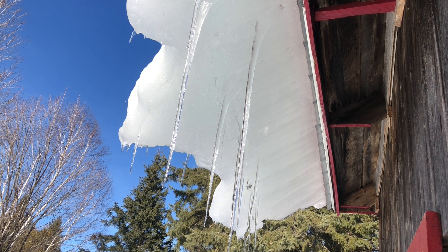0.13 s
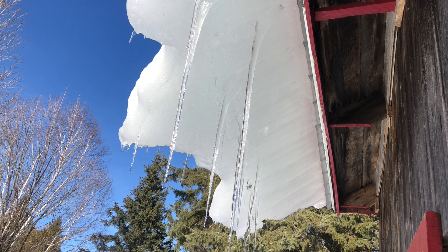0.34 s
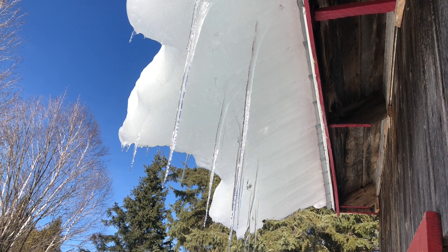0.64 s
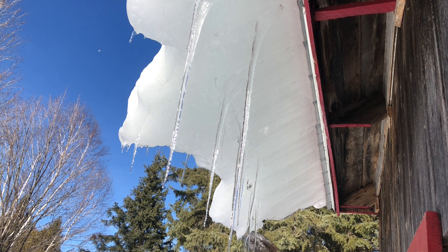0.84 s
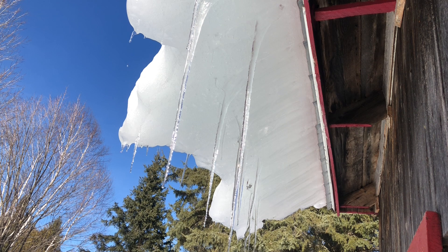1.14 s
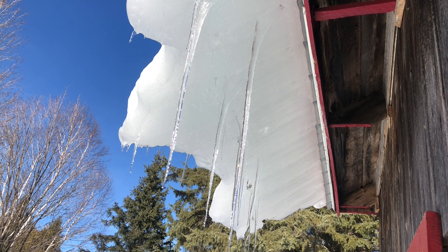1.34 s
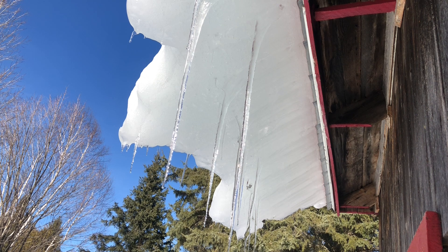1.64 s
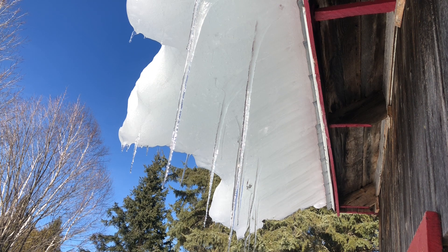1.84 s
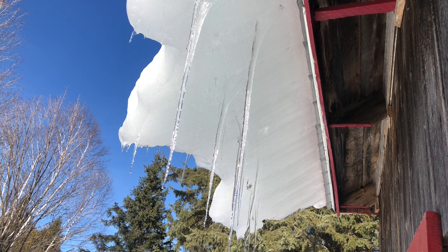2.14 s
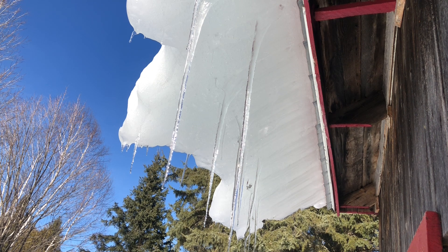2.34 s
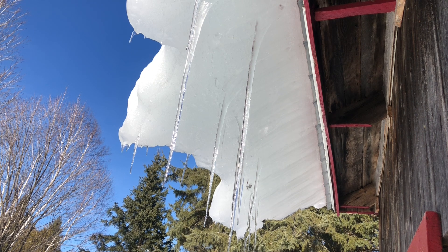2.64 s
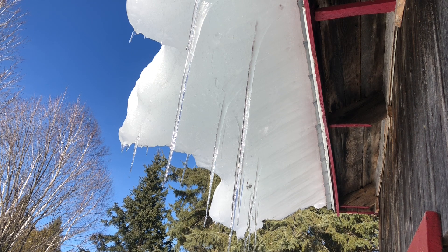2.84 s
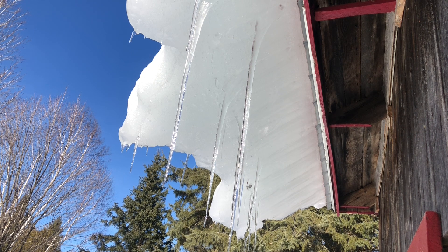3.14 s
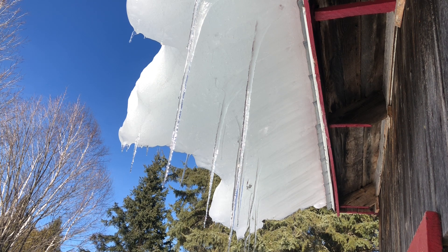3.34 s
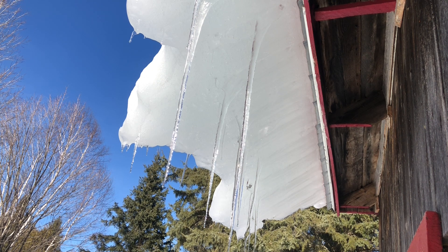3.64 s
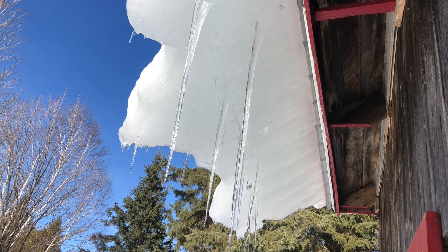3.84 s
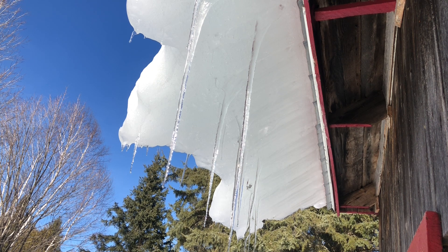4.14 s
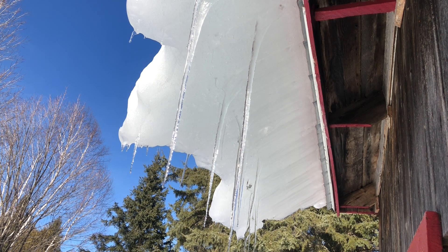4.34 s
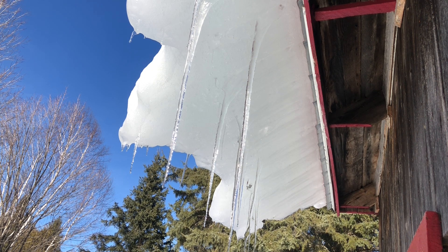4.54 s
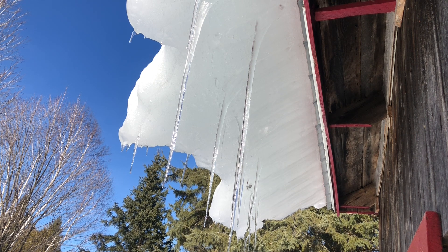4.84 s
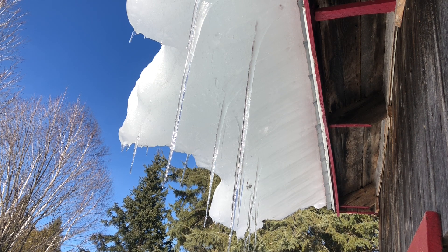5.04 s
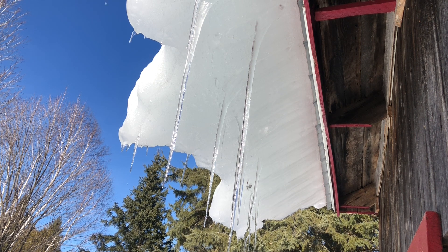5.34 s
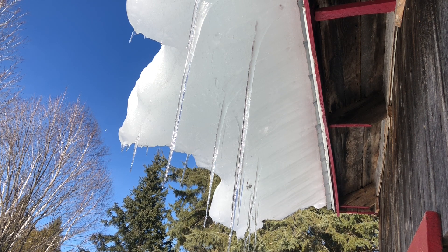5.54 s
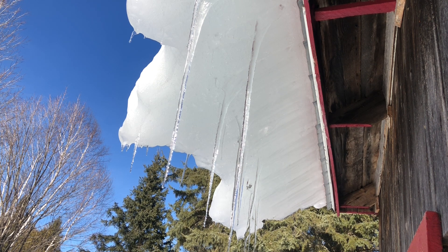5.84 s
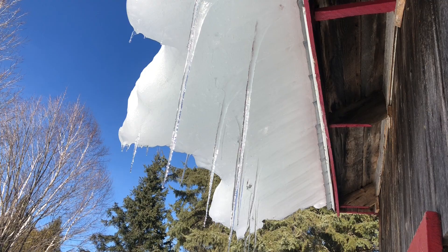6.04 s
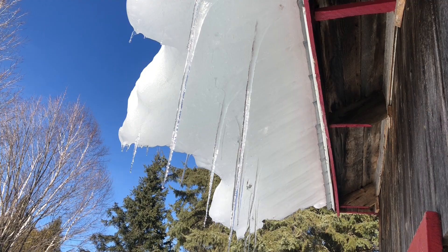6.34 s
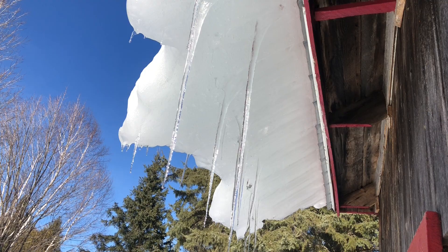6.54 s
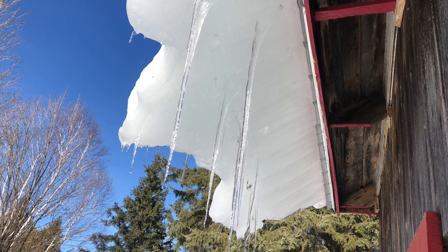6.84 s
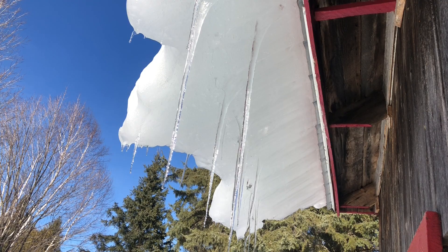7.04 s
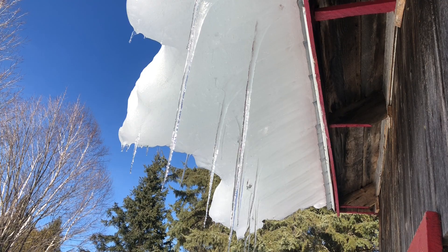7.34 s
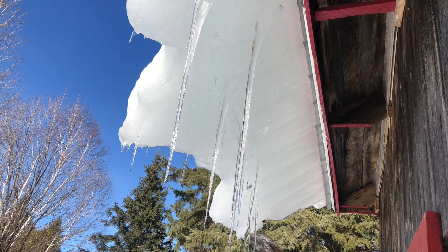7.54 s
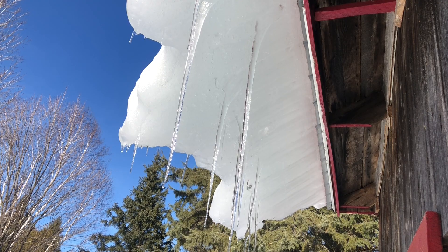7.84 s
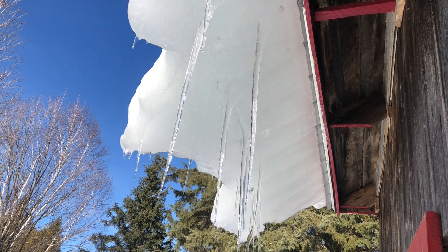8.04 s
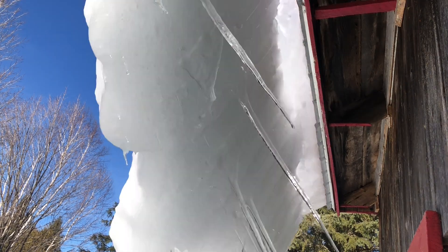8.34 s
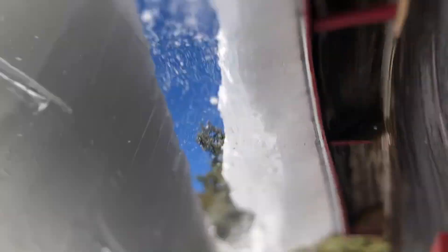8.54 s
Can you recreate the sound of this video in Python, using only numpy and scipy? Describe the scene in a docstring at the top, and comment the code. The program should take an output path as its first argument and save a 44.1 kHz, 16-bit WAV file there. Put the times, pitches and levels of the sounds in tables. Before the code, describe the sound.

Outdoors beside a shed, a faint hiss and low hum of distant traffic runs throughout. From the start until about 7.5 seconds, meltwater drips from icicles close by: quiet, sharp, irregular ticks, several a second, each with a tiny high ring and a fine splash. At about 0.8 seconds the snow slab on the roof gives a short crack, knocking through the boards and metal sheet. Another crack comes at about 7.5 seconds, followed by a quick run of smaller ones. Around 8 seconds the slab tears loose and slides, swelling into a loud, rough, grinding crunch with rumble and dull thuds. It is loudest from about 8.2 seconds to the end near 8.7, with bright clinks of snapping icicles around 8.6 and the peaks slightly overloading the microphone.

```python
"""Over the hiss of a distant road, meltwater drips from icicles under the eave of a shed:
each drop a tick, a short ring and a spray of droplets. The snow slab on the roof cracks a few
times, shaking the boards and the metal sheet, then tears loose and slides off with a grinding
crunch, rumble, snapping icicles and thuds, loud enough to round off in the phone."""
import sys
import numpy as np
from scipy import signal
from scipy.fft import rfft, irfft, next_fast_len
from scipy.io import wavfile
from scipy.ndimage import uniform_filter1d

SR = 44100
rng = np.random.default_rng(int(sys.argv[2]) if len(sys.argv) > 2 else 0)


def output_pcm(signal):
    """Save a mono or channel-first signal as 16-bit PCM at the path in sys.argv[1].

    Samples are clipped to [-1, 1] before scaling.
    """
    pcm = np.clip(np.atleast_2d(signal).T, -1, 1) * 32767
    wavfile.write(sys.argv[1], SR, np.round(pcm).astype(np.int16))


N = 382781
T = np.arange(N) / SR


def undb(db):
    return 10 ** (np.asarray(db) / 20)


def unit(x):
    return x / np.sqrt(np.mean(x ** 2))


def band(x, lo_hz, hi_hz):
    sos = signal.butter(2, [lo_hz, min(hi_hz, SR / 2.1)], "band", fs=SR, output="sos")
    return signal.sosfilt(sos, x)


def colour(x, points):
    """EQ through (f/Hz, level/dB) points."""
    hz, db = np.transpose(points)
    size = next_fast_len(len(x))
    log_f = np.log(np.maximum(np.fft.rfftfreq(size, 1 / SR), 1))
    return irfft(rfft(x, size) * undb(np.interp(log_f, np.log(hz), db)), size)[:len(x)]


def modes(x, table):
    """A bank of resonators in alternating polarity."""
    return sum((-1) ** k * undb(db) * signal.lfilter(*signal.iirpeak(hz, hz / width, fs=SR), x)
               for k, (hz, width, db) in enumerate(table))


def fade(t, t60):
    return np.exp(-np.log(1000) * np.maximum(t, 0) / t60)


def add(out, when, x):
    i = int(when * SR)
    out[i:i + len(x)] += x[:len(out) - i]


def walk(rate_hz):
    """Random sample-and-hold modulation, smoothed twice."""
    hold = int(SR / rate_hz)
    steps = np.repeat(rng.standard_normal(N // hold + 1), hold)
    return uniform_filter1d(uniform_filter1d(steps, hold), hold)[:N]


def grit(size, spread_db):
    """Dense breaking grains, a few of them much larger than the rest."""
    return unit(rng.standard_normal(size) * undb(spread_db * rng.exponential(size=size)))


# EQ curve of the road bed: f/Hz, relative level/dB
ROAD_EQ = [(18, -51), (30, -12.5), (86, -4.5), (170, -10.5), (280, -5), (426, -10), (540, -4), (632, -4.5),
           (1010, 1), (1630, -16.5), (2170, -21), (2540, -30), (5310, -42.5), (14400, -47.5), (16000, -55)]
# Passing traffic rides the bed: t/s, tyre level/dB, tyre tilt/(dB per octave), 250 Hz drone level/dB
TRAFFIC = [(0, 0, 7, 7), (.7, 1, 2.5, 5), (1.6, -1.5, 5.5, 3), (2.7, 0, 2.5, 0), (3.5, 1, 5, 1.5),
           (4.5, -1, 2.5, -0.5), (5.1, 1.5, 6.5, -1), (5.8, -1.5, 3.5, -2.5), (7.2, 0.5, 5.5, 2),
           (8.68, 1.5, 4, 13)]


def road():
    """Distant traffic in half-octave bands that swell and flicker a little; the rumble grows."""
    times, *columns = np.transpose(TRAFFIC)
    tyre_db, tilt_db, drone_db = (np.interp(T, times, column) for column in columns)
    rumble_db = -6.5 + 1.14 * T
    tyres_db = [tyre_db + tilt_db * octaves for octaves in (-.5, 0, .5)]
    faders_db = [rumble_db, rumble_db / 2, 0, drone_db, drone_db / 2, tyre_db, *tyres_db, tyre_db, 0]
    size = next_fast_len(N)
    spectrum = rfft(undb(-54) * unit(colour(rng.standard_normal(N), ROAD_EQ)), size)
    hz = np.maximum(np.fft.rfftfreq(size, 1 / SR), 1)
    half_octaves = np.clip(2 * np.log2(hz / 1000), -7, 3)
    out = np.zeros(N)
    for centre, db in enumerate(faders_db, start=-7):
        share = np.clip(1 - np.abs(half_octaves - centre), 0, 1)
        out += irfft(spectrum * share, size)[:N] * undb(db + 0.79 * walk(4.9))
    return out


# Engine tones: start t/s, crest t/s, end t/s, start f/Hz, end f/Hz, level/dB, waver rate/Hz
ENGINE_HUMS = [(5.5, 6.1, 7.9, 303, 294, -64.5, 9), (3, 6.0, 7.9, 97, 98, -71.5, 12),
               (0.0, 2.9, 4, 254, 204, -68, 26.3), (3, 3.1, 3.6, 673, 770, -64.5, 7),
               (3.5, 4.7, 4.5, 540, 560, -69, 12), (6, 8.5, 8.0, 202, 200, -68, 9)]


def engines():
    """Far engines hum, glide and waver; each swells toward its crest and drops out at its end."""
    out = np.zeros(N)
    steady, swell_db = 0.83, 6
    for start, crest, end, start_hz, end_hz, db, waver_hz in ENGINE_HUMS:
        hz = np.interp(T, [start, end], [start_hz, end_hz])
        tone = np.exp(2j * np.pi * np.cumsum(hz) / SR)
        waver = steady + unit(walk(waver_hz)) + 1j * unit(walk(waver_hz))
        swell = np.interp(T, [start, crest, end], [-1, 0, -1], left=-10, right=-10)
        out += undb(db + swell_db * swell) * np.real(tone * waver)
    return out


def drip(db, hz, treble_db):
    """A drop lands: a sharp tick, a short ring, and droplets that scatter after it."""
    t = T[:4000]
    tick = 3 * np.minimum(t / .0007, 1) ** 2 * fade(t - .0007, .004)
    envelope = tick + .5 * fade(t, 0.039) + undb(-0.5) * fade(t, 0.079)
    droplets = grit((3, len(t)), spread_db=2.9) * envelope
    mid = 1.17 * undb(-treble_db / 2) * band(droplets[0], 2930, 6100)
    splash = mid + undb(treble_db / 2) * band(droplets[1], 6500, 14050)
    pitched_spray = band(droplets[2], hz / 1.2, hz * 1.37)
    # duller drops ring louder, lower drops ring longer
    ring = undb(-5.5 - 0.05 * treble_db) * np.sin(2 * np.pi * hz * t)
    ring *= np.minimum(t / 0.0011, 1) * fade(t, 0.0089 + 48 / hz)
    drop = splash / np.abs(splash).max() + 0.48 * pitched_spray / np.abs(pitched_spray).max() + ring
    return undb(db) * drop / np.abs(drop).max()


# Close drops landing: t/s, level/dB, ring f/Hz, treble over mid/dB
DRIPS = [(0.2825, -63, 13600, 2), (0.3258, -56, 11200, 3), (0.4052, -51, 5570, -7),
         (0.5186, -49.5, 7740, 12), (0.552, -45.5, 7440, 3), (0.5894, -63, 10300, 8),
         (0.673, -45.5, 14660, -3), (1.0229, -53, 7550, 6), (1.266, -54.5, 3000, -6),
         (1.2937, -42, 14600, 14), (1.3, -47, 5450, -1), (1.3799, -55, 9710, 2), (1.3962, -55, 4800, -7),
         (1.4113, -48.5, 4830, 0), (1.4628, -49, 6540, 8), (1.495, -50.5, 10660, 13),
         (1.497, -49.5, 10000, 12), (1.552, -57.5, 3260, -10), (1.7367, -49, 5050, 12),
         (1.7652, -60, 11200, 5), (1.856, -48, 14600, 7), (2.0982, -57, 15400, 10), (2.4207, -58, 4870, 9),
         (2.4427, -58, 10600, 7), (2.6013, -58.5, 9650, 11), (2.7129, -56, 14100, 0),
         (2.8033, -44, 3830, -5), (2.8651, -54, 4860, 5), (2.8944, -49, 15120, 14), (3.09, -51.5, 5280, -6),
         (3.1493, -59.5, 9240, -3), (3.2408, -51.5, 10900, 18), (3.491, -48.5, 7000, 4),
         (3.6923, -51.5, 5660, 13), (3.8352, -49.5, 8700, -1), (3.8724, -49, 13700, 14),
         (4.0478, -54, 4410, -4), (4.0577, -51, 10490, 13), (4.18, -54, 6350, 12),
         (4.3791, -48.5, 5820, -4), (4.5386, -62, 13310, 2), (4.643, -53, 4670, -13),
         (4.8293, -52.5, 5800, -2), (4.9783, -49.5, 5070, -4), (5.2636, -47, 13220, 9),
         (5.2775, -41, 9200, 14), (5.2905, -55, 10500, 7), (5.3885, -60, 11050, 11),
         (5.614, -60.5, 13800, 1), (5.8044, -60, 7850, 3), (5.8509, -54, 5040, 1), (5.9025, -58, 6160, -3),
         (5.9144, -40.5, 10300, 9), (5.9626, -58.5, 5020, -1), (6.0177, -60, 4280, 5),
         (6.413, -53, 7700, 12), (6.683, -57, 3900, -6), (6.925, -49.5, 7400, 9), (6.9464, -55, 4360, 2),
         (7.0271, -61, 11300, 6), (7.0934, -65, 10900, 8), (7.3823, -51.5, 9400, 4),
         (7.4031, -54.5, 6550, 4), (7.4406, -57, 7850, -1), (7.4559, -50, 6300, -3)]


def drips():
    """The close drops, many faint ones further along the eave, and slapback from the shed wall."""
    out = np.zeros(N)
    for when, db, hz, treble_db in DRIPS:
        add(out, when, drip(db, hz, treble_db))
    for when, size, pitch, tilt in rng.random((75, 4)):
        add(out, when * N / SR, drip(db=-74 + 9 * size, hz=3500 + 9000 * pitch, treble_db=14 * tilt - 5))
    slap_s, slap_db = .0054, -18
    return out + undb(slap_db) * np.roll(out, int(slap_s * SR))


# Woody body of the roof boards: f/Hz, width/Hz, level/dB
BOARD_MODES = [(55, 71, -9), (157, 38, 0), (232, 45, 1.5), (302, 24, 1.5), (380, 60, 0), (464, 67, -0.5),
               (577, 150, -8.5), (830, 60, -11.5), (1270, 130, -12)]
# Bright ring of the roof sheet: f/Hz, width/Hz, level/dB
SHEET_MODES = [(2080, 270, -7.5), (2440, 44, 6.5), (2960, 180, -1.5), (3295, 89, 6), (3300, 27, 10),
               (3930, 200, 4), (4530, 43, 0.5), (6400, 27, 1), (6990, 130, -1)]
# Dry knock that opens each crack: f/Hz, width/Hz, level/dB
KNOCK_MODES = [(680, 128, -2), (1070, 200, -11.5)]
# The slab slips: t/s, level/dB, slip length/s, knock send/dB, crunch send/dB, hiss send/dB
CRACKS = [(0.778, -41, .005, 12, -2.5, -20), (0.786, -34.5, .026, 19, -4, -16),
          (7.477, -29, 0.011, 15.5, -1, -13.5), (7.574, -48.5, 0.014, 19, -3, -32),
          (7.7532, -48, 0.0052, 28, -8.5, -25), (7.772, -43.5, 0.0095, 28, -8, -28),
          (7.795, -47.5, 0.04, 19, -12, -24.5), (7.943, -39.5, 0.0036, 26, -4.5, -33),
          (7.965, -39.5, 0.009, 22, -10, -23), (7.99, -41.5, 0.0034, 21, -22, -25),
          (8.026, -40.5, 0.01, 28, -22, -23), (8.067, -31.5, 0.0044, 18, -7, -41),
          (8.089, -39, 0.0059, 22, -6, -35), (8.287, -31.5, 0.002, 10, 10.5, -12),
          (8.46, -32, 0.0036, 11, -8, -25), (8.533, -26, 0.014, 10, 8, -13)]


def cracks():
    """Each slip knocks, then small fractures shake the boards and the sheet; crumbs trickle after."""
    fractures, crumbs = np.zeros((2, 3, N))  # three buses each: body, crunch, ice hiss
    knocks = np.zeros(N)
    t = T[:SR // 2]
    for when, db, slip_s, knock_db, crunch_db, hiss_db in CRACKS:
        knocks[int(when * SR)] = undb(db + knock_db)
        for bus, send_db in enumerate((0, crunch_db, hiss_db)):
            grains = undb(db + send_db) * np.minimum(t / 0.00064, 1) * grit(len(t), spread_db=1.86)
            # a longer slip dies away more slowly and leaves more crumbs
            add(fractures[bus], when, grains * fade(t - slip_s, 0.046 + 2.4 * slip_s))
            add(crumbs[bus], when, grains * undb(-18.5 + 250 * slip_s) * fade(t, 0.39))
    body = 7 * modes(fractures[0] + crumbs[0] + knocks, BOARD_MODES) + 9 * modes(knocks, KNOCK_MODES)
    sheet = 1.6 * modes(fractures[1], SHEET_MODES)
    crunch = 0.81 * band(fractures[1] + 2.46 * crumbs[1], 1710, 5300)
    ice = fractures[2] + crumbs[2]
    hiss = band(ice, 3600, 15600) + 1.4 * band(ice, 7800, 10740)
    return body + sheet + crunch + hiss


def blow(db, hz, t60):
    """One struck resonance: a sine that builds within a cycle and dies away."""
    t = T[:SR // 4]
    return undb(db) * np.sin(2 * np.pi * hz * t) * np.minimum(t * hz / 0.72, 1) * fade(t, t60)


# Dull hits of snow: t/s, level/dB, f/Hz
THUDS = [(0.779, -25, 400), (0.787, -26, 368), (7.479, -26, 330), (7.488, -27, 290), (7.791, -39, 71),
         (7.97, -35, 66), (8.051, -18.5, 239), (8.089, -21, 96), (8.17, -21, 80), (8.22, -18, 90),
         (8.236, -8, 490), (8.287, -16, 81), (8.476, -7, 616), (8.522, -7.5, 340), (8.55, -9.5, 342),
         (8.57, -10, 90), (8.611, -4, 73), (8.63, -19, 48), (8.655, -17, 85)]
# Bright pings of ice: t/s, level/dB, f/Hz
CLINKS = [(8.54, -26, 4540), (8.556, -17.5, 3740), (8.589, -20, 3790), (8.595, -21, 5130)]


def impacts():
    """The roof thuds as the slab breaks and its lumps land; snapped icicle pieces ring."""
    out = np.zeros(N)
    for when, db, hz in THUDS:
        add(out, when, blow(db, hz, t60=0.014 + 6.5 / hz))
    for when, db, hz in CLINKS:
        add(out, when, blow(db, hz, t60=.05))
    return out


def shards(start, end):
    """Small ice fragments knock about in the moving snow, each with a brief pitch of its own."""
    out, t = np.zeros(N), T[:2000]
    for when, pitch, size, ring in rng.random((90, 4)):
        hz = 1700 * 2 ** (1.6 * pitch)
        ping = np.sin(2 * np.pi * hz * t) * fade(t, 0.012 + 0.06 * ring)
        add(out, start + when * (end - start), undb(12.4 * size - 5.5) * ping)
    return out


# Resonances of the grinding slab: f/Hz, width/Hz, level/dB
SLAB_MODES = [(336, 100, -4), (423.5, 13, 7), (522, 34, -5), (556.6, 29, 8.5), (685, 73, -3.5),
              (770, 75, 8), (860, 53, -2), (1055, 53, 7.5), (1115, 110, -5), (1260, 52, 6.5),
              (1340, 90, -5), (1646, 500, -3)]
# Automation of the slide: t/s, level/dB, brightness/dB
SLIDE_CURVE = [(7.945, -43, -9), (8.02, -43, -11), (8.06, -36.5, -10.5), (8.13, -35, -11), (8.23, -20, -11),
               (8.28, -22, -7.5), (8.32, -26, -7.5), (8.4, -21, -6.5), (8.46, -18, -3.5), (8.52, -19.5, 3),
               (8.58, -23.5, 4.5), (8.64, -23.5, -4.5), (8.68, -30, -6)]


def slide():
    """Snow grinds over the roof in uneven lurches: scrape, rumble, icy crunch and hiss."""
    times, *columns = np.transpose(SLIDE_CURVE)
    level_db, bright_db = (np.interp(T, times, column) for column in columns)
    grind = grit(N, spread_db=3.24)
    grind = unit(modes(grind, SLAB_MODES)) + 1.4 * unit(band(grind, 238, 2840))
    low_scrape = unit(band(grind, 236, 902)) * undb(3 * walk(70))
    high_scrape = unit(band(grind, 724, 1710)) * undb(bright_db + 3 * walk(110))
    rumble_db = -3.5 + .3 * (-24 - level_db)  # weighs more in the mix while the slide is quiet
    rumble = unit(band(rng.standard_normal(N), 52, 200)) * undb(rumble_db + 3.6 * walk(35))
    grains = grit(N, spread_db=2.2)
    crunch = unit(band(grains, 1300, 5370)) + 0.14 * unit(modes(grains, SHEET_MODES))
    crunch = 1.02 * unit(crunch) * undb(3.6 * walk(140))
    crunch = (crunch + shards(times[0], times[-1])) * undb(bright_db - 11)
    hiss = unit(band(grit(N, spread_db=2.0), 3900, 15000))
    hiss *= undb(-22 + 0.73 * bright_db + 1.6 * walk(150))
    fade_in = np.clip((T - times[0]) / 0.03, 0, 1)
    return (low_scrape + high_scrape + rumble + crunch + hiss) * undb(level_db) * fade_in


def scene():
    """Mono mix: the traffic bed, the dripping eave, and the snow slab on top."""
    return (road() + engines() + drips() + cracks() + impacts() + slide())[None]


def record(dry):
    """The phone drops the deepest bass, rounds the loudest peaks and cuts the top."""
    low_cut = signal.sosfilt(signal.butter(2, 45, "high", fs=SR, output="sos"), dry)
    rounded = np.tanh(1.642 * low_cut) / 1.553
    return signal.sosfilt(signal.ellip(10, .2, 90, 15800, fs=SR, output="sos"), rounded)


dry = scene()
out = record(dry)
output_pcm(out)
```